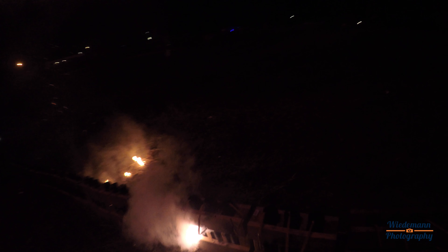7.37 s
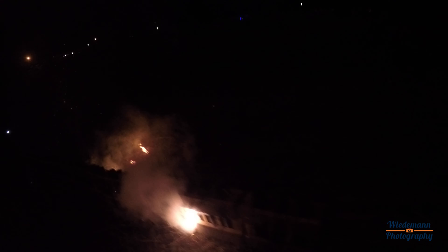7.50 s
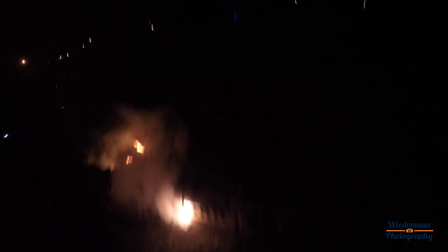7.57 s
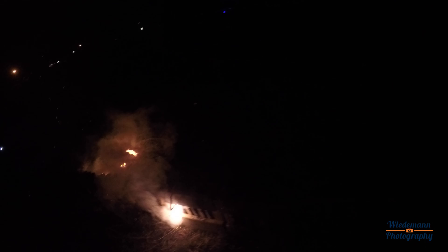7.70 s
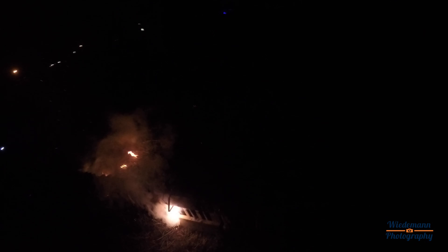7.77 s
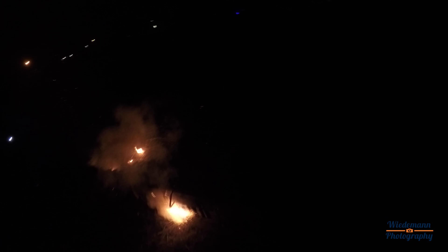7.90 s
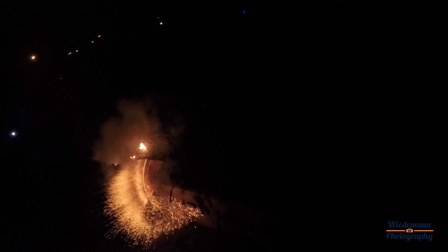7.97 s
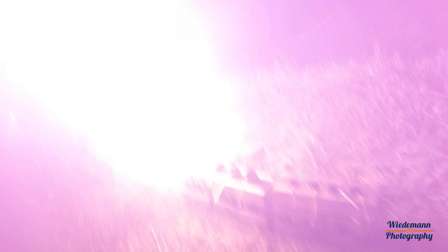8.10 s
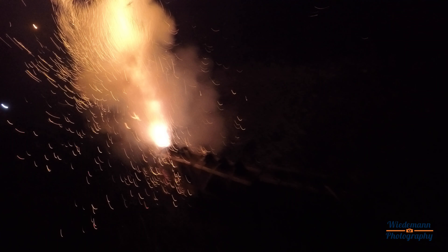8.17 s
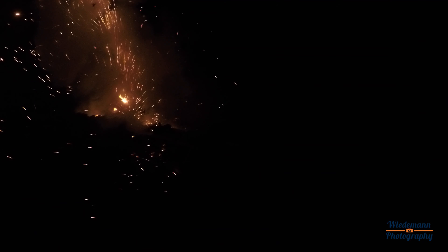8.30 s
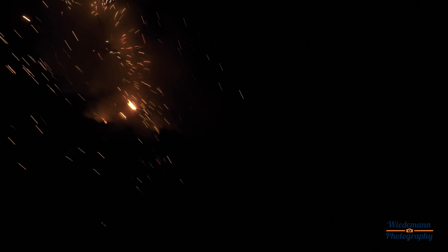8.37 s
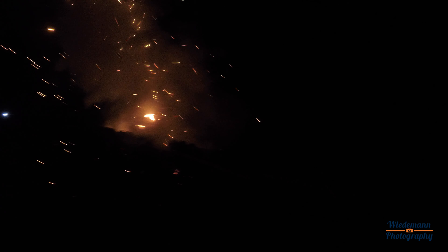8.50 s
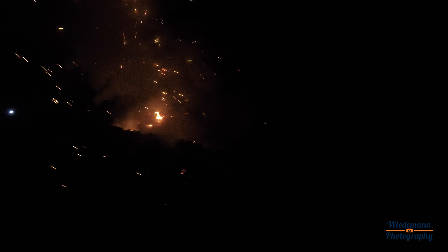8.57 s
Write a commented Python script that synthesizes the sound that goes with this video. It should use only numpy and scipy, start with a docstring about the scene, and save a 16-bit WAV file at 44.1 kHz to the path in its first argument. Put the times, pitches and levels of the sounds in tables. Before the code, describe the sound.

A flare hisses and sputters close by outdoors at night, broken by sharp overloaded bangs, clipped whooshing bursts, crackling sparks and low wind rumble.

```python
"""Fireworks close to a small camera

Outdoors at night, a flare hisses and sputters: shaped noise that brightens, dulls and turns hollow.
Sharp bangs (noise cracks, sinking booms, echoes) and swelling noise bursts overload the microphone.
Sparks crackle as tiny pitched snaps; short gliding tones, several within the bursts, and a faint squeak.
Gusts of air rumble as low noise and thud as damped swings on the microphone port."""
import sys
import numpy as np
from scipy import signal
from scipy.fft import rfft, irfft
from scipy.io import wavfile
from scipy.ndimage import uniform_filter1d

SR = 44100
rng = np.random.default_rng(int(sys.argv[2]) if len(sys.argv) > 2 else 0)


def master_out(mix):
    """Clip the mix to full scale and print it as 16-bit PCM to the path in sys.argv[1]."""
    frames = np.transpose(np.atleast_2d(mix))
    ceiling = np.clip(frames, -1, 1)
    pcm = np.round(ceiling * 32767).astype(np.int16)
    wavfile.write(sys.argv[1], SR, pcm)


N = 381465
TIME = np.arange(N) / SR  # s


def gain_of(db):
    """Turns dB into an amplitude factor."""
    return 10 ** (np.asarray(db) / 20)


def evened(x):
    """Scales a signal to rms 1."""
    return x / np.sqrt(np.mean(x ** 2) + 1e-20)


def read(points, hz):
    """Reads a table of values against frequency on a log-frequency axis."""
    f, value = np.transpose(points)
    return np.interp(np.log(hz + 1), np.log(f + 1), value)


def humps(table, hz):
    """Sums bell-shaped humps and hollows in dB."""
    return sum(db * np.exp(-((hz - f) / width) ** 2 * 2) for f, width, db in table)


def noise(points, count):
    """Filters white noise to the given spectrum, at rms 1."""
    white = rfft(rng.standard_normal(count))
    hz = np.fft.rfftfreq(count, 1 / SR)
    return evened(irfft(white * gain_of(read(points, hz)), count))


def waver(count, seconds):
    """Slow random wobble of rms 1: white noise averaged twice over the given time."""
    width = round(seconds * SR)
    once = uniform_filter1d(rng.standard_normal(count), width)
    return evened(uniform_filter1d(once, width))


def resonate(x, hz, width):
    """Rings a signal through one resonance of the given centre and width in Hz."""
    r = np.exp(-np.pi * width / SR)
    return signal.lfilter([1, 0, -1], [1, -2 * r * np.cos(2 * np.pi * hz / SR), r * r], x)


def add(mix, s, sound):
    """Mixes a sound in at time s."""
    part = mix[round(s * SR):][:len(sound)]
    part += sound[:len(part)]


# Colour of the hiss, shared by the faint floor, the sparks and the flare.
# Each row: frequency in Hz, relative level in dB per Hz.
HISS_SPECTRUM = [(120, -21.5), (200, -6.5), (424, -18), (867, -14), (1350, -10.5), (1710, -5), (3690, -6),
                 (4600, -18), (5330, -14.5), (13100, -35.5), (16000, -52)]


def faint_hiss():
    """Steady faint noise under the scene, in the colour of the hiss."""
    return gain_of(-74.0) * noise(HISS_SPECTRUM, count=N)


# Strength of the air on the microphone port. Each row: time in seconds, rms level in dB.
WIND_LEVEL = [(0, -45), (.45, -39.5), (.75, -31.5), (1.1, -33), (1.3, -24.5), (1.52, -35.5), (2.04, -28),
              (2.5, -42.5), (3.16, -44.5), (3.93, -36.5), (4.2, -43), (4.72, -31), (5.45, -34),
              (6.3, -39.5), (6.5, -33), (7.2, -34.5), (7.56, -28), (7.95, -29), (8.29, -51), (8.65, -54.5)]
# Colour of that rumble. Each row: frequency in Hz, relative level in dB per Hz.
WIND_SPECTRUM = [(7.1, -32.5), (12, 2.5), (22, 5.5), (34, -4.5), (51, -9.5), (92, -25.5), (161, -29.5),
                 (204, -32.5), (400, -59.5), (520, -77), (880, -120)]


def wind():
    """Lumpy low rumble of air on the port: low noise whose level comes and goes."""
    s, level_db = np.transpose(WIND_LEVEL)
    return gain_of(np.interp(TIME, s, level_db)) * noise(WIND_SPECTRUM, count=N)


# Pushes of air that suck the membrane back, then rebound.
# Each row: start in seconds, starting level in dB before the soft onset, first pitch in Hz (nominal),
# settled pitch in Hz, time to fall 60 dB in seconds.
THUDS = [(1.351, -6, 45, 32, .12), (2.534, -12, 140, 80, .04), (2.85, -36, 45, 35, .1),
         (4.668, -18, 55, 35, .1), (7.575, -14, 60, 40, .1), (8.010, -8, 130, 100, .04),
         (8.042, 6, 80, 35, .06), (2.5745, 7, 90, 45, .06), (3.1787, 1, 140, 28, .055)]


def thud(s, level_db, start_hz, end_hz, t60):
    """A damped swing of the membrane that starts inwards and slows."""
    t = TIME[:SR // 2]
    turns = end_hz * t + (start_hz - end_hz) * .006 * (1 - np.exp(-t / .006))
    onset = 1 - np.exp(-t * start_hz / 0.022)
    return s, -gain_of(level_db - 60 * t / t60) * np.sin(2 * np.pi * turns) * onset


# Course of the faint whistle. Each row: time in seconds, pitch in Hz, level in dB before its wobble.
SQUEAK = [(2.22, 1650, -66), (2.271, 1840, -56), (2.32, 2000, -57), (2.38, 2080, -57), (2.45, 2060, -56)]


def squeak():
    """A faint whistle that climbs, then nearly holds, made fuzzy by a fast wobble in level."""
    s, hz, db = np.transpose(SQUEAK)
    on = (TIME > s[0]) & (TIME < s[-1])
    turns = np.cumsum(np.interp(TIME, s, hz)) / SR
    level = gain_of(np.interp(TIME, s, db)) * (1 + .5 * waver(N, .004))
    return on * level * np.sin(2 * np.pi * turns)


# Short gliding tones, several within the bursts. Each row: start in seconds, peak level in dB,
# first pitch in Hz, last pitch in Hz (both before the wobble), length in seconds.
GLIDES = [(2.522, -18, 261, 200, 0.022), (2.567, -5, 170, 230, 0.0099), (3.06, -44.5, 197, 375, 0.033),
          (3.1735, -11, 332, 203, 0.008), (3.21, -43.5, 153.6, 144, 0.25), (4.157, -30, 332, 200, 0.0146),
          (5.186, -40, 1100, 650, .007), (8.004, -17.5, 496, 300, 0.016), (8.033, -8.5, 202, 261.7, .011)]


def glide(s, level_db, start_hz, end_hz, length):
    """A short tone that glides while its pitch wobbles, swelling and fading within its length."""
    t = TIME[:round(length * SR)]
    hz = np.linspace(start_hz, end_hz, len(t)) * (1 + 0.18 * waver(len(t), .008))
    swell = np.sin(np.pi * np.sqrt(t / length))
    return s, gain_of(level_db) * swell * np.sin(2 * np.pi * np.cumsum(hz) / SR)


# Fine crackle at the microphone.
# Each row: time in seconds, snaps per second, base level of a snap in dB (nominal).
CRACKLE = [(0, 52, -64), (1.55, 56, -68), (1.62, 150, -60), (1.8, 65, -46), (2.3, 20, -61.5),
           (7.3, 57, -51), (7.65, 150, -43.5), (7.7, 300, -38), (7.79, 150, -42), (7.83, 370, -36),
           (8.0, 500, -36), (8.03, 45, -78), (8.2, 120, -62), (8.65, 32.5, -68)]


def crackle():
    """Small snaps at random moments, of four pitches and uneven size."""
    s, rate, level_db = np.transpose(CRACKLE)
    extra_db = 3.0 * np.minimum(rng.exponential(1, N), 3)
    size = gain_of(np.interp(TIME, s, level_db) + extra_db)
    size *= rng.random(N) < np.interp(TIME, s, rate) / SR
    kind = rng.integers(0, 4, N)
    return sum(signal.oaconvolve(size * (kind == k), spark(0, 0, hz)[1])[:N]
               for k, hz in enumerate((1750, 2566, 3080, 3680)))


# Sparks with set moments, from loud snaps to very faint ones.
# Each row: start in seconds, nominal level in dB, pitch in Hz.
SPARKS = [(1.6012, -25, 2200), (1.6113, -21, 1830), (1.626, -35, 2020), (1.6515, -21.5, 1920),
          (2.4538, -30, 2560), (2.9956, -29, 3810), (3.0075, -23, 1800), (3.9994, -27, 2370),
          (4.1569, -18.5, 3100), (7.6159, -26, 3340), (7.6732, -22.9, 1830), (7.6943, -23, 2760),
          (7.7004, -15, 3400), (7.7187, -17, 2020), (7.7276, -17.5, 3320), (7.7465, -16, 2320),
          (7.7495, -21, 2370), (7.7677, -25, 3380), (7.8156, -25, 1980), (7.8276, -11, 3260),
          (7.8357, -20, 2650), (7.846, -25, 3490), (7.8629, -13.2, 2600), (7.8738, -15.5, 3380),
          (7.8858, -21.3, 2070), (7.9066, -21, 3340), (7.9271, -18, 3540), (7.9582, -14.4, 2930),
          (8.1905, -47.5, 1960), (8.2362, -47, 2540), (8.2837, -51.7, 2240)]


def spark(s, level_db, hz):
    """A snap about a millisecond long, with a short pitch and a faint tail, soft at both band edges."""
    t = TIME[:1200]
    raw = noise(HISS_SPECTRUM, count=len(t))
    snap = np.exp(-t / .0005) * (np.sin(2 * np.pi * hz * t) + .4 * raw)
    snap += .16 * np.exp(-t / .004) * raw  # faint tail
    onset = 1 - np.exp(-t / .00015)
    band = signal.butter(2, (1100, 5500), "bandpass", fs=SR, output="sos")
    return s, gain_of(level_db) * 1.25 * signal.sosfilt(band, snap * onset)


# Changing level of the hiss between spurts, swollen after bangs by their tails.
# Each row: time in seconds, relative level in dB, treble against that level in dB.
HISS_COURSE = [(0, -36, -11.5), (.27, -42.5, -17), (.65, -41.5, -19.5), (1.1, -42.5, -13),
               (1.14, -48.5, -13), (1.5, -48, -12), (1.6, -44.5, -13), (2.2, -43.5, -14.5),
               (2.3, -48.5, -10), (2.6, -49, -9.5), (2.68, -62, -9.5), (2.74, -57, -7), (2.88, -59.5, -9),
               (3.12, -59, -7.5), (3.28, -49, -7), (3.4, -48, -14), (4.02, -47, -14), (4.07, -35, -9),
               (4.4, -41.5, -17), (5.3, -43.5, -16), (6.01, -45.5, -14.5), (6.06, -36.5, -12.5),
               (6.6, -37, -20), (6.85, -34.5, -12.5), (7.2, -42, -16), (7.45, -37.5, -13.5),
               (7.68, -39, -19), (7.98, -32, -7.5), (8.06, -47, -16), (8.11, -69, -16), (8.22, -57.5, -10),
               (8.3, -70, -12), (8.48, -68, -17), (8.65, -71.5, -16)]
# Spurts, when the flame flares up for a moment. Each row: start in seconds, length in seconds,
# relative level in dB, treble against that level in dB, rise time constant in seconds.
SPURTS = [(0.668, 0.057, -35.5, -17, .012), (.745, 0.066, -44.5, -16, .006), (0.857, 0.012, -37, -17, .004),
          (0.901, 0.022, -34, -16.5, 0.0036), (0.945, 0.0088, -36, -19, .004),
          (0.994, 0.09, -32, -16, 0.0054), (1.231, .055, -37, -17, .001), (1.297, 0.062, -32, -14.5, .01),
          (1.373, 0.055, -46, -14, .006), (1.55, 0.036, -40, -16, .008), (1.695, .03, -35, -22, .006),
          (1.74, .06, -42, -16, .01), (1.841, 0.024, -45, -15, .008), (1.946, 0.022, -36.5, -19, 0.0083),
          (2.004, 0.061, -34, -16, 0.013), (2.087, 0.039, -35.5, -18.5, .006),
          (2.216, 0.032, -42.5, -20, .01), (2.458, 0.07, -26.5, -2, 0.0034),
          (2.998, 0.017, -42.5, -5, 0.0026), (3.044, 0.027, -40, -6.5, 0.0089),
          (3.317, 0.069, -42, -12, 0.0073), (3.42, .09, -46, -14, .015), (4.635, .04, -36.5, -17, .01),
          (4.747, 0.029, -42, -18, .01), (6.5, .08, -36.5, -16, 0.014), (6.62, .03, -38, -18, .01),
          (7.458, 0.022, -37.5, -16, .006), (7.558, 0.017, -35.5, -12, .006),
          (7.927, 0.064, -27.5, -4.5, 0.02)]
HISS_ROAR_DB, SPURT_ROAR_DB = -9, -14  # low roar against level
SPURT_FALL_S = 0.0086  # time constant


def flame(t):
    """Adds hiss and spurts by power: level dB, treble and roar dB against it, share of the spurts."""
    s, level_db, treble_db = np.transpose(HISS_COURSE)
    hiss = gain_of(np.interp(t, s, level_db)) ** 2
    start, length, spurt_db, bright_db, rise = np.transpose(SPURTS)[:, :, None]
    rising = np.minimum(t - start, 0) / rise
    falling = np.maximum(t - start - length, 0) / SPURT_FALL_S
    spurts = (gain_of(spurt_db) * np.exp(rising - falling)) ** 2
    spurt_sum = spurts.sum(0)
    total = hiss + spurt_sum
    treble = hiss * gain_of(np.interp(t, s, treble_db)) ** 2 + (spurts * gain_of(bright_db) ** 2).sum(0)
    roar = hiss * gain_of(HISS_ROAR_DB) ** 2 + spurt_sum * gain_of(SPURT_ROAR_DB) ** 2
    return *(10 * np.log10([total, treble / total, roar / total])), spurt_sum / total


# When the flare sounds hollow.
# Each row: time in seconds, share of the hollow colour from 0 to 1, factor on its frequencies.
HOLLOW_COURSE = [(4.72, 0, 1.03), (4.86, .9, 1.01), (5.15, 1, 1.0), (5.55, 1, .99), (5.8, 1, 1.02),
                 (6.0, .8, 1.07), (6.04, 0, 1.07)]
# The hollow colour, as if a near surface threw the hiss back.
# Each row: centre in Hz before that factor, width in Hz before it, height in dB at full share.
HOLLOW_HUMPS = [(1300, 170, -5), (1650, 280, 1), (2080, 220, -9), (2570, 660, 9), (3140, 330, -7),
                (3650, 450, -5), (4170, 300, -5.5), (4700, 300, 10), (5150, 250, -3), (5500, 300, 4),
                (6200, 450, -7), (6700, 350, 6), (13500, 3000, 7)]
# Usual humps and hollows in the colour of the hiss, used again for the echoes of the bangs.
# Each row: centre in Hz, width in Hz, height in dB.
USUAL_HUMPS = [(1372, 160, -9), (1660, 120, 4), (3636, 160, 4.5), (4120, 300, -6), (5310, 600, 5),
               (5950, 730, -3), (6970, 490, 5), (13500, 2600, 3.5)]
# Extra colour of the spurts. Each row: centre in Hz, width in Hz, height in dB when spurts are all one hears.
SPURT_HUMPS = [(900, 300, 3), (3530, 900, 3.5), (7800, 1000, 3), (9000, 900, -2), (10600, 1200, 3),
               (13500, 2500, 5)]
SPURT_FLUTTER_DB = 1.5  # extra sputter in the spurts


def flare():
    """Burning jet: patchy noise, built frame by frame, that brightens, dulls and goes hollow a while."""
    frames = N // 128 + 5
    hz = np.fft.rfftfreq(512, 1 / SR)[:, None]
    t = np.arange(frames) * 128 / SR
    level_db, treble_db, roar_db, lit = flame(t)

    a, b, patches = rng.standard_normal((frames, 257, 3)).T
    patches = uniform_filter1d(patches, size=5, axis=0)
    patches = evened(uniform_filter1d(patches, size=14, axis=1))
    sputter = evened(uniform_filter1d(rng.standard_normal(frames), size=3))  # shared by all bands

    when, *columns = np.transpose(HOLLOW_COURSE)
    share, stretch = (np.interp(t, when, c) for c in columns)
    focus = humps([(3350, 1400, -.25 * (roar_db + 8.5))], hz)  # a jet with less roar hisses higher
    colour_db = read(HISS_SPECTRUM, hz) + focus + lit * humps(SPURT_HUMPS, hz)
    colour_db += (1 - share) * humps(USUAL_HUMPS, hz) + share * humps(HOLLOW_HUMPS, hz / stretch)
    colour = gain_of(colour_db)

    def strength(low_hz, high_hz):
        """Strength of the colour within a band, frame by frame."""
        inside = (hz[:, 0] > low_hz) & (hz[:, 0] < high_hz)
        return np.sqrt((colour[inside] ** 2).sum(0))

    body, treble, roar = strength(1400, 4000), strength(5000, 12000), strength(300, 1200)
    # Treble and roar are tilted against the body, each fading in over half an octave
    high = np.clip(np.log2(hz / 3800 + 1e-9) / .5, 0, 1)
    low = np.clip(np.log2(1500 / (hz + 1)) / 0.5, 0, 1)
    treble_tilt = (gain_of(treble_db) * body / treble) ** high
    roar_tilt = (gain_of(roar_db) * body / roar) ** low
    colour *= treble_tilt * roar_tilt / body

    flicker_db = 2.0 * patches + (1.1 + SPURT_FLUTTER_DB * lit) * sputter
    flicker_db *= 1 - 0.55 * share  # calmer while hollow
    z = (a + 1j * b) * colour * gain_of(level_db + flicker_db)
    return 0.64 * signal.istft(z, nperseg=512, noverlap=384)[1][:N]


# Swelling bursts of flame. Each row: moment of full strength in seconds, level in dB, rise time constant
# in seconds, hold in seconds, time to fall 60 dB in seconds, whistle in Hz, whistle share from 0 to 1,
# ring level in dB.
BURSTS = [(2.518, -13, .005, .002, .04, 3500, .1, -70), (2.525, -6, .0008, .01, .02, 3000, .1, -70),
          (2.546, -14, .001, .001, .02, 2500, .5, -70), (2.5685, -1, .002, .008, .008, 2400, .2, -33),
          (3.174, -7, .003, .004, .028, 1700, .35, -48), (8.0035, -12, .001, .001, .015, 2700, .4, -70),
          (8.007, -3, .0006, .003, .015, 2800, .3, -70), (8.0145, -6, .0008, .002, .025, 2650, .6, -70),
          (8.0225, -14, .0008, .001, .025, 2650, .7, -70), (8.037, 1, .0015, .006, .008, 2400, .75, -32)]
# Colour of the bursting jet. Each row: frequency in Hz, relative level in dB per Hz.
JET_SPECTRUM = [(180, -33), (300, 0), (511, -7.5), (1190, -5.5), (2520, -0.5), (3080, -6), (3580, 3),
                (4230, -10), (6960, -8), (7690, -16), (12700, -24), (15200, -26.5), (16000, -36.5)]
RING_HZ, RING_T60 = 1872, 0.26  # a metal part nearby rings, loudest after the hardest bursts (Hz, s)


def burst(s, level_db, rise, hold, fall, whistle_hz, share, ring_db):
    """Noise that swells, holds and is cut off; part of it whistles in one resonance."""
    lead = .03  # s of swell before full strength
    t = TIME[:SR // 2] - lead
    shape = np.exp(np.minimum(t, 0) / rise) * gain_of(-60 * np.maximum(t - hold, 0) / fall)
    raw = noise(JET_SPECTRUM, count=len(t))
    whistle = signal.hilbert(resonate(raw, whistle_hz, 160))
    whistle = evened((whistle / np.sqrt(abs(whistle) + 1e-9)).real)  # steadier in level than plain noise
    jet = shape * ((1 - share) * raw + share * whistle)
    glow = gain_of(-29.0 - 60 * t / 0.17) * (t > 0) * raw  # short afterglow
    tone = np.sin(2 * np.pi * RING_HZ * t + .3 * waver(len(t), .006))
    ring = gain_of(ring_db - 60 * t / RING_T60) * tone * (t > hold)
    return s - lead, gain_of(level_db) * (jet + glow) + ring


# Sharp bangs close by. Each row: start in seconds, crack level in dB, crack time to fall 60 dB in seconds,
# boom level in dB before its soft onset, boom's first pitch in Hz (nominal), its settled pitch in Hz,
# its time to fall 60 dB in seconds, echo level in dB (nominal).
BANGS = [(1.5785, -16.5, 0.017, -17.5, 256, 98.1, 0.039, -45),
         (4.035, 2, 0.032, 4.5, 232, 200, 0.035, -30.5), (6.0228, -1.5, 0.037, -1, 252, 112, 0.062, -28.5),
         (6.6708, -15, 0.016, -18.5, 230, 99, 0.043, -61),
         (6.726, 3.5, 0.027, 11.5, 252, 194, 0.024, -28.5), (7.222, -5.5, 0.057, -8.5, 220, 84, 0.1, -32.5),
         (7.2298, -18, 0.009, -8.5, 240, 117, 0.037, -36.5)]
# Colour of the crack and echoes. Each row: frequency in Hz, relative level in dB per Hz.
CRACK_SPECTRUM = [(180, -29), (300, -4), (455, -1.5), (725, -11.5), (1210, -9.5), (2700, -1.5), (4230, -16),
                  (5250, -19), (7950, -27), (10600, -31.5), (11900, -44), (14500, -48), (16000, -47.5)]
# Colour of the low part of the echo. Each row: frequency in Hz, relative level in dB per Hz.
ROLL_SPECTRUM = [(40, -8), (90, 9.5), (200, 2.5), (450, -18.5), (800, -15), (2000, -39.5)]
# Fading of the echoes. Each row: frequency in Hz, time to fall 60 dB in seconds.
ECHO_FADE = [(200, 0.47), (1000, 0.23), (3000, .6), (8000, 0.66), (15000, 0.2)]
SHOCK_DB, SHOCK_S, SHOCK_HZ = -13, .0007, 4000  # bright first snap: against crack, decay, lower edge
ECHO_GRAIN_DB = 2.5  # unevenness of the echoes from moment to moment


def bang(s, crack_db, crack_t60, boom_db, start_hz, end_hz, boom_t60, echo_db):
    """A sudden crack, a boom that sinks in pitch, a low roll, and echoes that fade by frequency."""
    t = TIME[:SR]
    crack = gain_of(crack_db - 60 * t / crack_t60) * noise(CRACK_SPECTRUM, count=SR)
    high_pass = signal.butter(2, SHOCK_HZ, "highpass", fs=SR)
    bright = signal.lfilter(*high_pass, rng.standard_normal(SR))
    crack += gain_of(crack_db + SHOCK_DB) * np.exp(-t / SHOCK_S) * bright

    turns = end_hz * t + (start_hz - end_hz) * 0.0087 * (1 - np.exp(-t / 0.0081))
    boom = gain_of(boom_db - 60 * t / boom_t60) * np.sin(2 * np.pi * turns - 1.2)
    boom *= 1 - np.exp(-t / 0.000745)  # soft onset

    roll = gain_of(echo_db + 8.0 - 60 * t / 0.28) * noise(ROLL_SPECTRUM, count=SR)
    hz, u, z = signal.stft(noise(CRACK_SPECTRUM, count=SR), SR, nperseg=256)
    grain_db = ECHO_GRAIN_DB * rng.standard_normal(len(u))
    fade_db = -60 * u / read(ECHO_FADE, hz)[:, None]
    z *= gain_of(echo_db + grain_db + humps(USUAL_HUMPS, hz)[:, None] + fade_db)
    echoes = signal.istft(z, SR, nperseg=256)[1][:SR]
    return s, crack + boom + (roll + echoes) * (1 - np.exp(-t / 0.001))


def scene():
    """All sources summed at one microphone."""
    mix = faint_hiss() + wind() + squeak() + crackle() + flare()
    for table, play in ((THUDS, thud), (GLIDES, glide), (SPARKS, spark), (BURSTS, burst), (BANGS, bang)):
        for row in table:
            add(mix, *play(*row))
    return mix[None]


EDGE_HZ = 15600  # upper band limit


def record(dry):
    """The input overloads near full scale with a hard knee; then the band limit takes the top off."""
    clipped = np.clip(dry, -.9, .9)
    clipped = clipped + .07 * np.tanh(dry - clipped)  # the excess still squeezes through a little
    low_pass = signal.firwin(255, EDGE_HZ, window=("kaiser", 8), fs=SR)
    return signal.oaconvolve(clipped, low_pass[None], "same")


dry = scene()
out = record(dry)
master_out(out)
```